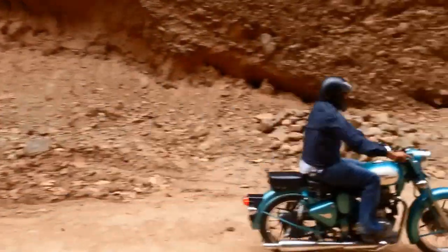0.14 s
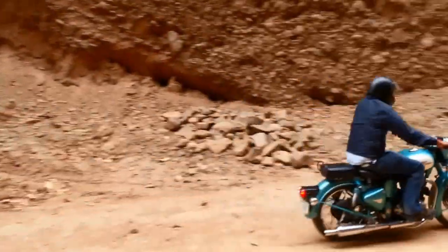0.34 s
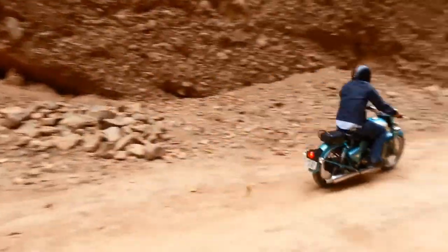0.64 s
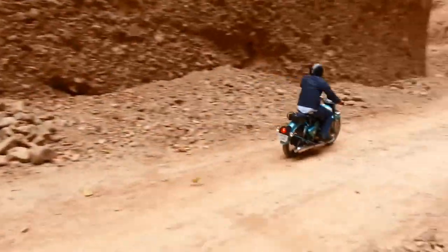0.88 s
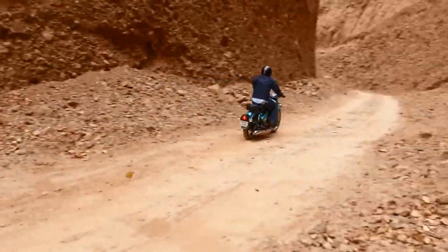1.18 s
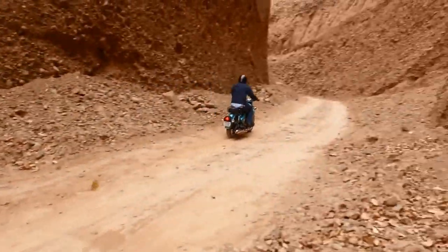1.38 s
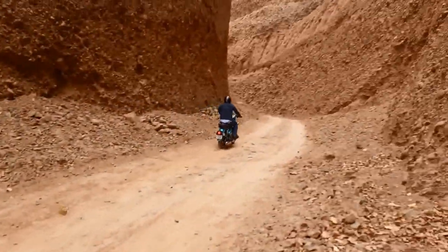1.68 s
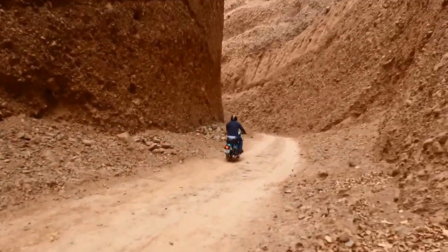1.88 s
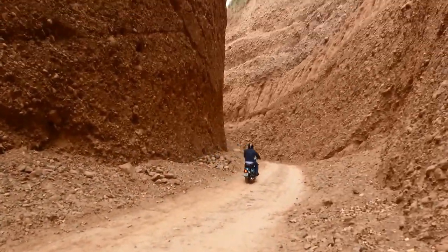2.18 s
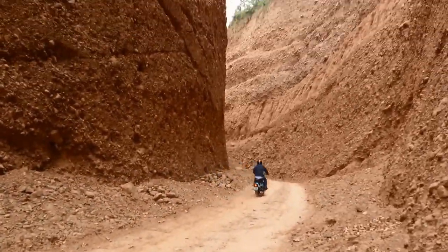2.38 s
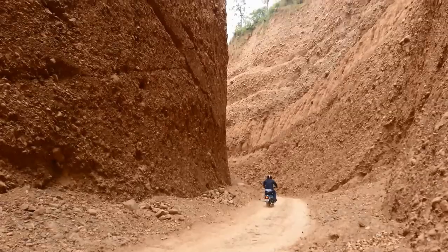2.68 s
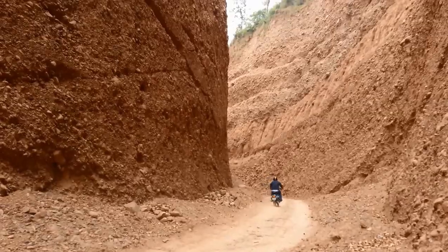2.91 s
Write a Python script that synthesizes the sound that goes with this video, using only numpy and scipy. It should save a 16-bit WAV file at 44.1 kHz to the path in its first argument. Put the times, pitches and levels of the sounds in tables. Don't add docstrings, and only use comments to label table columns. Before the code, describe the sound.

Motorcycle with a low, rapid exhaust beat passes near and recedes between echoing earth walls.

```python
import sys
import numpy as np
from scipy import signal
from scipy.io import wavfile
from scipy.ndimage import uniform_filter1d

SR = 44100
rng = np.random.default_rng(int(sys.argv[2]) if len(sys.argv) > 2 else 0)


def generate_wav(signal):
    frames = np.transpose(np.atleast_2d(signal))
    scaled = np.clip(frames, -1, 1) * 32767
    pcm = np.round(scaled).astype(np.int16)
    wavfile.write(sys.argv[1], SR, pcm)


def amplitude_ratio(level_db):
    exponent = np.asarray(level_db, float) / 20
    return 10 ** exponent


N = 134505
TOP_HZ = 12000


def evened(x):
    return x / np.sqrt(np.mean(x ** 2) + 1e-20)


def read(points, hz):
    f, value = np.transpose(points)
    return np.interp(np.log(hz + 1), np.log(f + 1), value)


def ride(t, order):
    # (time [s], distance [0 near - 1 far], beat level [dB], rattle level [dB],
    # lean to the left [dB], echo level [dB])
    path = np.array([(0, 0.02, -1.5, -18, 2, 2), (.15, 0.022, -2.5, -19, -1, 5),
                     (.3, 0.053, 0.5, -16.5, 1, -2), (.47, 0.038, 1, -17, 1.5, -5),
                     (.6, 0.056, 1.5, -19.5, 0, -6), (0.801, 0.45, -2.5, -17.5, 0, -4.5),
                     (1.0, 0.28, -3.5, -19.5, 1, -5), (1.201, 0.54, -3, -18.5, -0.5, 2),
                     (1.4, 0.45, -3, -19.5, 0, -2.5), (1.601, 0.34, -1, -22, 0.5, -2.5),
                     (1.8, 0.47, -3, -22, .5, 0), (2.0, 0.6, 1.5, -25.5, 2, -4),
                     (2.2, .66, -1.5, -24.5, 4, 2), (2.402, 0.62, -1.5, -25.5, 1, 2.5),
                     (2.6, 0.63, 0, -27, 0.5, -12), (2.8, 0.61, -3.5, -27.5, 3.5, -2.5),
                     (3.05, 0.67, -4.5, -28.5, 2, -6)])
    return np.interp(t, path[:, 0], path[:, order])


def add(mix, s, sound):
    at = round(s * SR)
    part = mix[max(at, 0):][:len(sound) + min(at, 0)]
    part += sound[max(-at, 0):][:len(part)]


def hiss(near, far, size, patchy_db, flicker_db):
    # (frequency [Hz], coherence [0-1])
    likeness = [(60, 0.92), (230, 0.38), (920, 0.31), (3570, 0.2), (14000, 0.11)]
    # (frequency [Hz], left minus right [dB])
    balance = [(60, -14.5), (180, 3), (530, -2), (1580, 2.5), (4690, 3.5), (14000, -12)]
    frames, hz = 4 * N // size + 5, np.fft.rfftfreq(size, 1 / SR)
    a, b, c, d, patch = rng.standard_normal((frames, len(hz), 5)).T
    patch = uniform_filter1d(patch, size=9, axis=0)
    patch = evened(uniform_filter1d(patch, size=11, axis=1))
    flicker = evened(uniform_filter1d(rng.standard_normal(frames), size=4))
    away = np.clip(ride(np.arange(frames) * size / 4 / SR, order=1), 0, 1)
    shape = amplitude_ratio(read(near, hz)[:, None] * (1 - away) + read(far, hz)[:, None] * away)
    shape = shape / np.sqrt((shape ** 2).mean(0))
    shape = shape * amplitude_ratio(patchy_db * patch + flicker_db * flicker)
    same = np.clip(read(likeness, hz), -1, 1)[:, None]
    lean = amplitude_ratio(read(balance, hz) / 2)[:, None]
    left = a + 1j * b
    right = same * left + np.sqrt(1 - same ** 2) * (c + 1j * d)
    z = np.array([left * lean, right / lean]) * shape
    return evened(signal.istft(z, nperseg=size, noverlap=3 * size // 4)[1][:, :N])


def rumble():
    # (frequency [Hz], level per Hz [dB])
    colour = [(12, -53), (20, -20), (77, 3.5), (135, 5), (259, 1.5), (471, -9), (600, -32), (780, -43),
              (1320, -120)]
    return amplitude_ratio(-19.5) * hiss(colour, colour, size=2048, patchy_db=-4.0, flicker_db=-0.5)


def stones():
    per_s = 230
    size = amplitude_ratio(4.8 * np.minimum(rng.exponential(1, N), 3)) * (rng.random(N) < per_s / SR)
    kind, u, out = rng.integers(0, 24, N), np.arange(600) / SR, np.zeros((2, N))
    for k, hz in enumerate(np.geomspace(900, 8500, 24)):
        ping = np.exp(-u * hz / 4.9) * np.sin(2 * np.pi * hz * u)
        out[k % 2] += signal.oaconvolve(size * (kind == k), ping)[:N]
    return evened(out + .5 * out[::-1])


def rattle(burst):
    # (frequency [Hz], level per Hz [dB])
    near_colour = [(240, -29), (400, -26), (559, -0.5), (1360, -6.5), (2540, -4.5), (4420, -9.5),
                   (5920, -4), (7470, -4.5), (13000, -36)]
    far_colour = [(240, 8.5), (400, -5), (676, -12), (866, -23.5), (1080, -19), (1460, -29), (5830, -19),
                  (10900, -34.5), (13000, -55)]
    noise = hiss(near_colour, far_colour, size=256, patchy_db=2.0, flicker_db=1.1) * (1 + burst)
    stones_db = -14
    return (noise + amplitude_ratio(stones_db) * stones()) * amplitude_ratio(ride(np.arange(N) / SR, order=3))


def firings():
    # (time [s], firings so far [count])
    progress = [(0.0219, 0), (0.0999, 1), (0.752, 10), (0.8939, 12), (0.9628, 13), (1.0354, 14),
                (1.1042, 15), (1.4823, 21), (1.6182, 23), (1.6884, 24), (1.8852, 27), (1.9561, 28),
                (2.4256, 35), (2.7672, 40), (2.8304, 41), (2.8915, 42), (2.9694, 43), (3.0394, 44)]
    uneven = {0: (-6.5, 0, -3.2), 1: (0.38, 0, 10), 2: (-4, 0.00032, 0.57), 3: (5, 0, 1),
              5: (-1.1, -0.0019, -1), 6: (6.9, -0.0042, 1), 7: (-3.5, 0.00074, -2.6), 8: (2.7, 0, 0.38),
              9: (5.8, 0.00317, 1), 10: (-6, 0, 1), 11: (3.8, -0.00084, -0.5), 13: (0.2, 0, 0.95),
              14: (1.8, 0, 10.4), 16: (-0.16, 0.002784, -1.5), 18: (0.67, 0.0014, 0.4),
              19: (2.12, -0.0019, -0.041), 20: (-0.52, -0.0033, 0.88), 21: (2.7, 0, 10.7),
              22: (.3, 0.0015, 13.4), 24: (0.25, 0, 5.16), 25: (0.22, 0.00206, 8.2),
              26: (-0.68, -0.0011, -0.5), 28: (2.8, 0, 3.5), 29: (-0.28, 0, 1.2), 32: (0.33, 0.00214, 0.99),
              33: (0.16, 0, 4.7), 36: (0.19, -0.00422, 1.3), 38: (0.55, 0, 0.84), 41: (0.99, 0, -1.6),
              42: (-8.5, 0, -1.24)}
    s, done = np.transpose(progress)
    turns = np.arange(int(done[-1]) + 1)
    extra_db, late, bark_db = np.transpose([uneven.get(k, (0, 0, 0)) for k in turns])
    return np.interp(turns, done, s) + late, extra_db, bark_db


def exhaust():
    # (frequency near [Hz], frequency far [Hz], level near [dB], level midway [dB],
    # level far [dB], swell time [s])
    modes = [
        (69.1, 77.6, -6, -14, -10, 0.013),
        (97, 109.5, -8, -8.5, -5.5, 0.0066),
        (140.8, 168.6, -4.5, -5.5, -27.5, 0.0082),
        (193.7, 251, -7.5, -4, -40, 0.0042),
        (249, 286, -13.5, -16, -6, 0.0054),
        (373, 338, -20, -26, 4, 0.0041),
        (765, 600, -36, -17, -24.5, 0.003),
        (1176.4, 1015, -31, -27, -54, 0.0038),
    ]
    hard_rebounds = {6: 21.7, 9: 16, 28: 3.33, 36: 2.3, 37: 3}
    rebound_s, rebound_db = .0095, (-24.5, -9)
    lead_s, detune, scatter_db = 0.0039, 0.049, 3
    hard_rings = .03
    bark_above_hz = 500
    tick_db, tick_far_db, tick_s, tick_lead_s = -9, -7, 0.0012, 0.0032
    puff_db, puff_s = -3, 0.0031
    beat, burst, u = np.zeros(N), np.zeros(N), np.arange(4000) / SR
    times, force_db, barks = firings()
    luck = rng.standard_normal((len(times), len(modes), 3))
    for k, (s, db, bark_db, dice) in enumerate(zip(times, force_db, barks, luck)):
        away = np.clip(ride(s, order=1), 0, 1)
        rebound = amplitude_ratio(np.interp(away, (.45, .62), rebound_db) + hard_rebounds.get(k, 0))
        for (near_hz, far_hz, *place_db, swell), (a, b, c) in zip(modes, dice):
            hz = (near_hz + (far_hz - near_hz) * away) * (1 + detune * a)
            bark = hz > bark_above_hz
            level_db = np.interp(away, (0, .5, 1), place_db) + scatter_db * b + db + ride(s, order=2)
            level = amplitude_ratio(level_db + bark_db * bark)
            v = u / (swell * np.exp(hard_rings * db * (hz < 160)))
            envelope = (v * np.exp(1 - v)) ** 2
            ring = -level * envelope * np.cos(2 * np.pi * hz * (u - lead_s) + 2 * c * bark)
            add(beat, s - lead_s, ring)
            add(beat, s - lead_s + rebound_s, rebound * ring * (hz < bark_above_hz))
        tick = amplitude_ratio(tick_db + (tick_far_db - tick_db) * min(2 * away, 1)) * np.exp(-u / tick_s)
        puff = amplitude_ratio(puff_db) * u / puff_s * np.exp(1 - u / puff_s)
        spit_db = .4 * db + .2 * bark_db + 1.5 * dice[0, 0]
        add(burst, s - tick_lead_s, amplitude_ratio(spit_db) * (tick + puff))
    return beat, burst


def gorge(x):
    # (delay [s], level [dB])
    echoes = [
        (0.0207, -4.5),
        (0.034, -5),
        (.047, -29),
    ]
    t60, start_s, wide = 1, 0.017, 0.22
    near_db, far_db = -6, -5
    out, t, u = np.zeros((2, N)), np.arange(N) / SR, np.arange(SR // 2) / SR
    for k in range(3):
        taps = rng.standard_normal((3, SR // 2)) * (rng.random((3, SR // 2)) < .02)
        taps = (taps[0] + wide * taps[1:]) * amplitude_ratio(-60 * u / t60) * (u > start_s)
        taps = taps / np.linalg.norm(taps[0])
        for s, db in echoes:
            delay = s * rng.uniform(.93, 1.07) + rng.uniform(0, .0012, 2)
            taps[[0, 1], np.round(delay * SR).astype(int)] += amplitude_ratio(db)
        turn = np.sqrt(2 / 3) * np.cos(np.pi * (2.3 * t + k / 3))
        out += signal.fftconvolve((x * abs(turn))[None], taps, axes=1)[:, :N]
    return out * amplitude_ratio(near_db + (far_db - near_db) * ride(t, order=1) + ride(t, order=5))


def cracks():
    # (time [s], peak level [dB], pitch [Hz], decay time [s])
    snaps = [(0.099, -2, 2280, 0.0012), (0.165, -14, 6100, 0.0012), (0.2466, 5.5, 2790, 0.0012),
             (0.469, 9.5, 5850, 0.00091), (0.508, -11, 5850, 0.00093), (0.609, -8, 1500, 0.001),
             (0.674, -5, 6860, 0.0028), (0.6784, 3.5, 1480, 0.00093), (0.786, -14, 5960, 0.0013),
             (0.819, -18, 2300, 0.00092), (0.929, -6, 1960, 0.0014), (0.959, -32, 3910, 0.0012),
             (1.0294, -5, 2850, 0.0011), (1.278, -7.5, 3390, 0.00099), (1.2924, -7, 6650, 0.00066),
             (1.3555, -3, 3050, 0.00099), (1.415, -28, 6070, 0.0012), (1.4785, -6.5, 2430, 0.0016),
             (1.555, -13, 6160, 0.0012), (1.616, -7, 8440, 0.0015), (1.686, -8.5, 5280, 0.00097),
             (1.757, -1, 3950, 0.00064), (1.881, -12, 3750, 0.0012), (1.9524, -15, 5500, 0.00093),
             (2.02, -12.5, 5340, 0.0018), (2.0882, -9.5, 5640, 0.001), (2.2205, -22, 3214, 0.0016),
             (2.285, -12, 4600, 0.0019), (2.492, -25, 6050, 0.0012), (2.574, -29, 5470, 0.0011),
             (2.627, -21, 4470, 0.0012)]
    wide, air_db = 2.6, -16
    out, u = np.zeros((2, N)), np.arange(900) / SR
    for (s, db, hz, length), noise in zip(snaps, rng.standard_normal((len(snaps), 3, 900))):
        band = signal.butter(1, [hz / wide, min(hz * wide, 12000)], "band", fs=SR, output="sos")
        puff = (noise[0] + 1.05 * noise[1:]) * np.exp(-u / length)
        puff = signal.sosfilt(band, puff) + amplitude_ratio(air_db) * puff
        for side, part in zip(out, puff / abs(puff).max()):
            add(side, s, amplitude_ratio(db) * part)
    return out


def air():
    # (middle time [s], length [s], level [dB])
    flickers = [(.245, .01, -50), (0.466, 0.014, -24), (.69, .02, -28), (0.788, 0.013, -35),
                (0.844, 0.013, -34), (1.033, .012, -41), (1.69, .01, -61), (2.015, .012, -60),
                (2.845, 0.0089, -43)]
    t = np.arange(N) / SR
    band = signal.butter(4, [TOP_HZ - 800, 14500], "band", fs=SR, output="sos")
    swells = sum(amplitude_ratio(db) * np.exp(-((t - s) / length) ** 2) for s, length, db in flickers)
    return swells * evened(signal.sosfilt(band, rng.standard_normal((2, N))))


def drone():
    # (time [s], pitch [Hz], level [dB])
    climb = [
        (.77, 120, -45),
        (.82, 127, -17),
        (.92, 140, -15),
        (1.02, 147, -18),
        (1.1, 155, -16),
        (1.18, 165, -17),
        (1.25, 172, -40),
    ]
    s, hz, db = np.transpose(climb)
    t = np.arange(N) / SR
    waver = evened(uniform_filter1d(rng.standard_normal(N), size=900))
    pitch = np.interp(t, s, hz) * (1 + 0.029 * waver)
    phase = 2 * np.pi * np.cumsum(pitch) / SR
    return np.sqrt(2) * amplitude_ratio(np.interp(t, s, db)) * np.sin(phase)


def rasps():
    # (middle time [s], length [s], pitch [Hz], level [dB])
    flutters = [
        (.785, .012, 720, -24),
        (2.435, .03, 620, -21),
        (2.9, .05, 400, -24),
    ]
    out, t = np.zeros((2, N)), np.arange(N) / SR
    for s, length, hz, db in flutters:
        band = signal.butter(1, [hz * 0.71, hz * 1.06], "band", fs=SR, output="sos")
        rough = signal.sosfilt(band, rng.standard_normal((2, N)))
        rough = evened(signal.sosfilt(band, rough))
        out += amplitude_ratio(db) * np.exp(-((t - s) / length) ** 2) * rough
    return out + 0.37 * out[::-1]


def scene():
    beat, burst = exhaust()
    steady = rattle(burst) + rumble() + beat + gorge(beat) + cracks() + drone() + rasps()
    steady = signal.sosfiltfilt(signal.butter(8, TOP_HZ, fs=SR, output="sos"), steady)
    lean = amplitude_ratio(ride(np.arange(N) / SR, order=4) * np.array([[.5], [-.5]]))
    return (steady + air()) * lean


def low_pass(x):
    return signal.sosfilt(signal.butter(12, 14560, fs=SR, output="sos"), x)


def record(dry):
    # (start time [s], length [s], depth [dB])
    dips = [(0.029, 0.024, 4.5), (.107, 0.0078, 5), (0.147, 0.028, 5), (.252, .014, 8.5),
            (0.371, 0.019, 4.5), (0.497, 0.014, 5.5), (0.615, .014, 8.5), (0.735, 0.016, 8.5),
            (0.757, 0.02, 8), (0.826, 0.016, 9), (1.043, 0.01, 11), (1.107, .01, 6), (1.235, 0.015, 4.5),
            (1.296, 0.0092, 4), (1.362, 0.012, 8), (1.417, 0.019, 6.5), (1.489, 0.019, 5.5),
            (1.558, 0.0072, 6), (1.623, .01, 4), (1.759, 0.011, 8), (1.976, .045, 2), (2.302, 0.011, 4)]
    limit_db, squeeze, recover_db_per_s = -9, 0.29, 307
    low_cut_hz, dip_edge_s, ceiling = 60, .003, 1.04
    t = np.arange(N) / SR
    heard = signal.sosfiltfilt(signal.butter(3, low_cut_hz, "high", fs=SR, output="sos"), dry)
    power = uniform_filter1d((heard ** 2).mean(0), size=200, origin=99)
    power_db = 10 * np.log10(abs(power) + 1e-12)
    fall = t * recover_db_per_s
    held_db = np.maximum.accumulate(power_db + fall) - fall
    over_db = np.maximum(held_db - limit_db, 0)
    ducked = heard / amplitude_ratio(squeeze * uniform_filter1d(over_db, size=520, origin=259))
    dip_db = np.zeros(N)
    for s, length, depth_db in dips:
        inside_s = np.minimum(t - s, s + length - t)
        dip_db += depth_db * np.clip(inside_s / dip_edge_s + .5, 0, 1)
    level = ducked / amplitude_ratio(dip_db) / ceiling
    return low_pass(ceiling * level / (1 + level ** 4) ** (1 / 4))


dry = scene()
out = record(dry)
generate_wav(out)
```